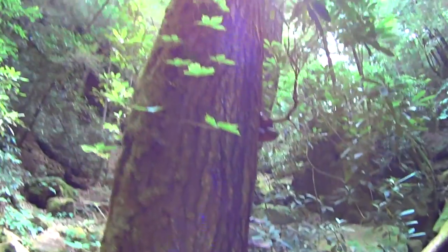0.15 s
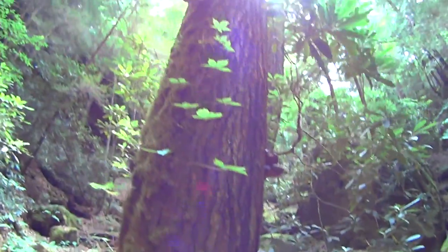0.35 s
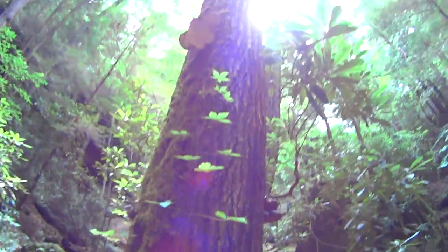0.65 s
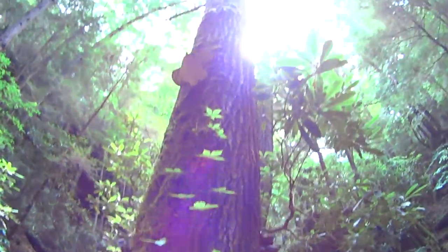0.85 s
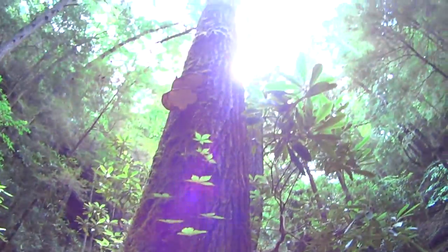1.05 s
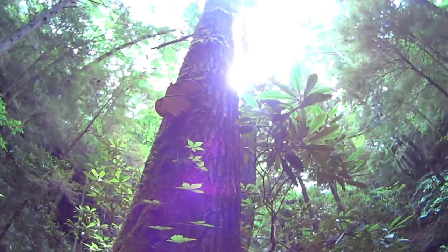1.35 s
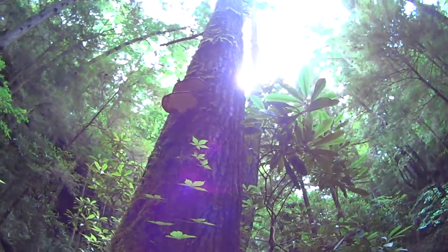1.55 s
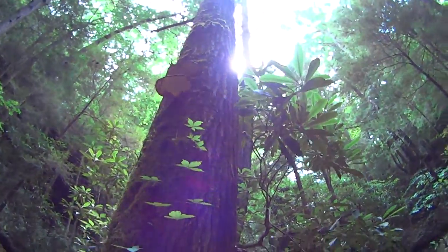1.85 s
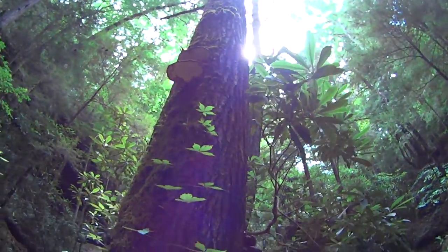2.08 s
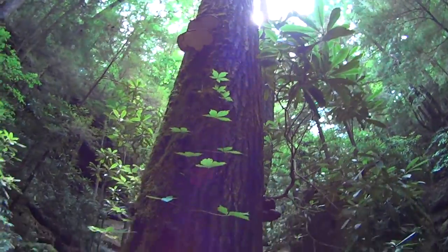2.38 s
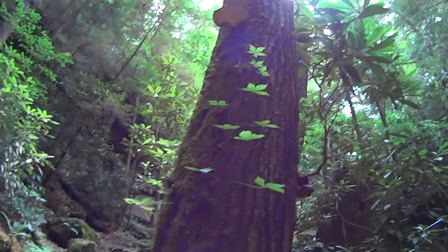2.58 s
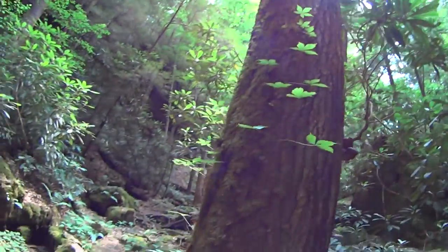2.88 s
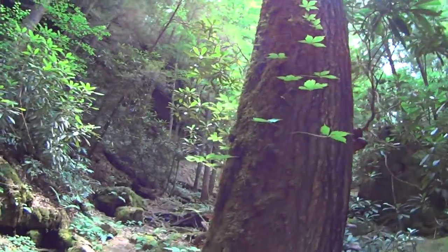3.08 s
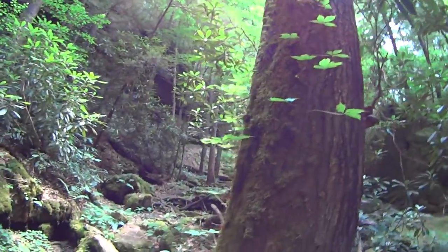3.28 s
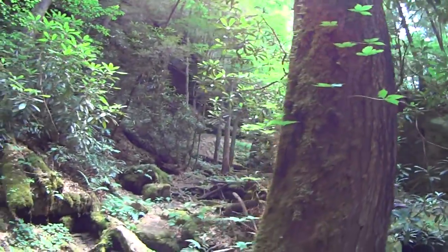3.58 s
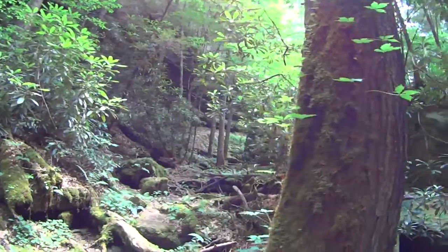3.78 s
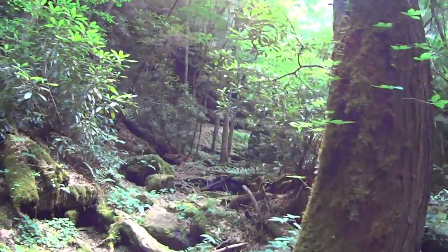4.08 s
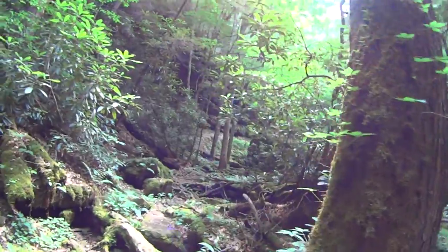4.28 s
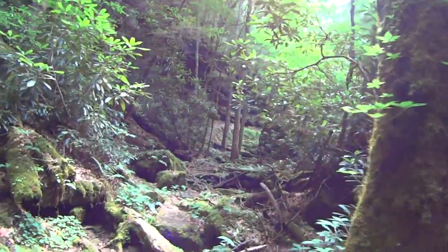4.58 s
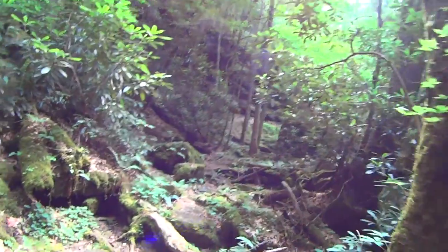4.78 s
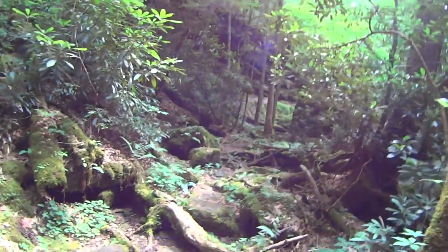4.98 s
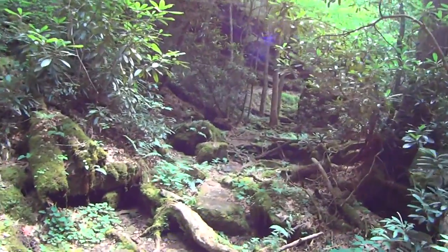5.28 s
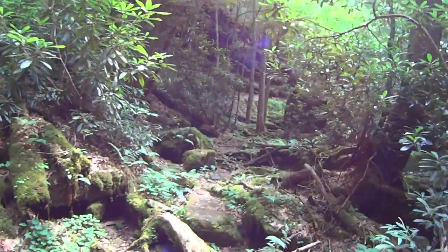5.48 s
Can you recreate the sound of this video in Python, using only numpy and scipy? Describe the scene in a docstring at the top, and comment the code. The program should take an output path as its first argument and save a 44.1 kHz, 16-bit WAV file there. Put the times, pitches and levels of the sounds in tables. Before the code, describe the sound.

Close trickling water with little splashes and hissing spray thins to a faint wash, interrupted by hollow plastic taps and brief handling squeaks.

```python
"""A small brook runs over rocks in a forest, its near water fading as a hand-held camera turns away.
Water: filtered noise for the steady wash, patchy noise and droplets for the fizzing spray,
resonant hollows and rising bubble tones for the trickle, enveloped noise for the splashes.
Hand: knocks, stick-slip rubs and grip noise drive the modes of the plastic camera case."""
import sys
import numpy as np
from scipy import signal
from scipy.fft import rfft, irfft, next_fast_len
from scipy.io import wavfile
from scipy.ndimage import uniform_filter1d

SR = 44100
rng = np.random.default_rng(int(sys.argv[2]) if len(sys.argv) > 2 else 0)


def pcm_store(signal):
    """Save signal as 16-bit PCM."""
    levels = np.round(np.clip(np.atleast_2d(signal), -1, 1) * 32767)
    wavfile.write(sys.argv[1], SR, levels.astype(np.int16).T)


N = 248724
TIME_S = np.arange(N) / SR


def gain_of(db):
    """Decibels to amplitude."""
    return 10 ** (np.asarray(db) / 20)


def evened(x):
    """Scales to rms 1."""
    return x / np.sqrt(np.mean(x ** 2) + 1e-20)


def read(points, hz):
    """Interpolates a table over log frequency."""
    point_hz, value = np.transpose(points)
    return np.interp(np.log(hz + 1), np.log(point_hz + 1), value)


def add(mix, start_s, sound):
    """Mixes a stereo sound in at start_s, cut at the end of the mix."""
    part = mix[:, max(round(start_s * SR), 0):][:, :sound.shape[1]]
    part += sound[:, :part.shape[1]]


def colour(x, gain):
    """Filters by a zero-phase gain given as a function of frequency."""
    size = next_fast_len(x.shape[-1] + 2048)
    spectrum = rfft(x, size) * gain(np.fft.rfftfreq(size, 1 / SR))
    return irfft(spectrum, size)[..., :x.shape[-1]]


def hump(hz, centre_hz, octaves):
    """Gain of a soft band around a centre."""
    return 1 / (1 + (np.log2((hz + 1) / centre_hz) / octaves) ** 2)


def patches(shape, size):
    """Random blotches over frequency and time, rms 1."""
    smooth = uniform_filter1d(rng.standard_normal(shape), size=size, axis=0)
    return evened(uniform_filter1d(smooth, size=size, axis=1))


def churn(patchy_db, flicker_db):
    """Two noises whose level wanders in shared time-frequency patches and flickers as a whole."""
    z = signal.stft(rng.standard_normal((2, N)), nperseg=256)[2]
    patch = patches(z.shape[1:], size=8)
    flicker = evened(uniform_filter1d(rng.standard_normal(z.shape[2]), size=6))
    z = z * gain_of(patchy_db * patch + flicker_db * flicker)
    return evened(signal.istft(z)[1][:, :N])


def mottle(x, depth_db):
    """Countless tiny bubbles: narrow bands rise and dip in level for a moment."""
    z = signal.stft(x, nperseg=1024)[2]
    z = z * gain_of(depth_db * patches(z.shape[1:], size=2))
    return evened(signal.istft(z)[1][:, :N])


def drops(per_s, spread_db):
    """Random impacts, mostly small and a few large."""
    size = gain_of(spread_db * np.minimum(rng.exponential(1, N), 4))
    return size * rng.choice([-1, 1], N) * (rng.random(N) < per_s / SR)


# Water balance of the ports, right mostly louder: hz [Hz], left_minus_right_db [dB]
PORT_BALANCE = [(300, 0.5), (600, -1.5), (1100, -2.5), (1900, -5), (3400, -3), (6000, -3.2), (11000, -2.5)]


def ports(pair, same):
    """Mixes two unrelated signals to the likeness and balance of water at two microphone ports."""
    likeness = lambda hz: np.clip(read(same, hz), 0, 1)
    mid = colour(pair[0], lambda hz: np.sqrt(1 + likeness(hz)))
    side = colour(pair[1], lambda hz: np.sqrt(1 - likeness(hz)))
    left_right = np.array([mid + side, mid - side])
    return colour(left_right, lambda hz: gain_of(np.outer([.5, -.5], read(PORT_BALANCE, hz))))


# Likeness of the ports for near water: hz [Hz], likeness [0-1]
NEAR_LIKENESS = [(300, 0.2), (600, .15), (1160, 1), (2440, 0.55), (5000, 0.9), (11000, 0.89)]


def near_ports(pair):
    """Near water as the two ports hear it."""
    return ports(pair, NEAR_LIKENESS)


# Near water as the camera turns away: time_s [s], level_db [dB]
NEAR_LEVEL = [(0, -43), (1.3, -44.5), (2.1, -44), (3.05, -42.5), (3.35, -45), (4.0, -46.5), (4.25, -45.5),
              (4.5, -51.5), (4.75, -47.5), (4.97, -55), (5.37, -56), (5.64, -49)]


def near_water():
    """Gain of the near water for every sample."""
    return gain_of(np.interp(TIME_S, *np.transpose(NEAR_LEVEL)))


# Resonant hollows between the rocks: centre_hz [Hz], width_hz [Hz], level_db [dB]
ROCK_HOLLOWS = [(1000, 790, -2.5), (1226, 75, 0.5), (1826, 310, -4), (2347, 220, -1), (2685, 130, 0),
                (3085, 570, -4.5), (4220, 840, -2)]


def hollows(hz):
    """Gain of the hollows, their resonances summed in power."""
    power = 0
    for centre_hz, width_hz, level_db in ROCK_HOLLOWS:
        detuning = (hz - centre_hz ** 2 / (hz + 1)) / width_hz
        power = power + gain_of(level_db) ** 2 / (1 + detuning ** 2)
    return np.sqrt(power)


# Spectrum of the far wash: hz [Hz], relative level_db [dB per Hz]
WASH_SPECTRUM = [(25, 4), (60, -4.5), (130, -5), (280, -2), (450, -2), (800, -0.5), (1500, -2),
                 (2500, -3.5), (3300, -7.5), (5500, -8.5), (8000, -11.5), (11000, -18)]
# Likeness of the ports for far water: hz [Hz], likeness [0-1]
FAR_LIKENESS = [(60, 0.7), (260, 0.16), (550, 0.6), (1160, 0), (2440, 0.4), (5000, 0.1), (11000, 0)]
WASH_DB = -50.5


def wash():
    """The even rush of the brook farther off: shaped noise with mild level patches."""
    water = churn(patchy_db=3.0, flicker_db=0.5)
    water = colour(water, lambda hz: gain_of(read(WASH_SPECTRUM, hz)))
    return gain_of(WASH_DB) * evened(ports(water, FAR_LIKENESS))


def wander(rate_hz):
    """A smooth random curve of rms 1."""
    return evened(colour(rng.standard_normal(N), lambda hz: np.exp(-(hz / rate_hz) ** 2)))


# Bursts of spray: peak_s [s], lift_db [dB]
SPRAY_BURSTS = [(.015, 4), (.1, 2), (.2, 8), (.42, 5), (.905, 5), (1.46, 8), (1.916, 9.5), (2.235, 7),
                (2.618, 6.5), (2.98, 2.5), (3.07, 4), (3.41, 6), (4.193, 5)]
SURGE_RISE_S, SURGE_FALL_S = 0.003, 0.026
SPRAY_WANDER_DB, SPRAY_WANDER_HZ = 1, 35  # random swell: rms depth and rate


def surges():
    """Gain of the spray: each burst leaps up and falls back, over a random swell."""
    lift_db = SPRAY_WANDER_DB * wander(SPRAY_WANDER_HZ)
    for peak_s, burst_db in SPRAY_BURSTS:
        rise = (peak_s - TIME_S) / SURGE_RISE_S
        fall = (TIME_S - peak_s) / SURGE_FALL_S
        lift_db += burst_db * np.exp(-np.maximum(rise, fall))
    return gain_of(lift_db)


# Spectrum of the spray: hz [Hz], relative level_db [dB per Hz]
SPRAY_SPECTRUM = [(1000, -17), (2500, -11), (3500, -4), (4300, -2), (5400, 0.5), (7000, 1.5), (9000, 1),
                  (11000, -0.5)]
SPRAY_DB = 2.3  # against the near water, before the surges


def spray():
    """Fine droplets fizz where the water breaks on rocks: mottled noise plus dense impacts."""
    droplets = evened(np.array([drops(per_s=2500, spread_db=8.0) for _ in range(2)]))
    mist = churn(patchy_db=1.94, flicker_db=1.5)
    fizz = mottle(mist, depth_db=2.1) + .3 * droplets
    fizz = near_ports(colour(fizz, lambda hz: gain_of(read(SPRAY_SPECTRUM, hz))))
    return gain_of(SPRAY_DB) * near_water() * surges() * evened(fizz)


TRICKLE_DB = -45.5  # reference for the two parts below
FLOW_DB, BUBBLES_DB = -3, -14
TRICKLE_FOLLOWS = 0.87  # share of the near water's dB changes


def trickle():
    """Water tumbles through the hollows, trapping small bubbles that ring and rise in pitch."""
    tumble = mottle(churn(patchy_db=3.5, flicker_db=1.3), depth_db=4.0)
    flow = evened(near_ports(colour(tumble, hollows)))
    t = np.arange(2048) / SR
    bubbles = np.zeros((2, N))
    for bubble_hz in np.geomspace(950, 4600, num=24):
        tone = np.sin(2 * np.pi * bubble_hz * t * (1 + 1.35 * t))
        ring = tone * np.exp(-t * bubble_hz / 20) * (1 - np.exp(-t * bubble_hz / 2))
        pan_db = rng.normal(-3.5, 3)  # left minus right
        births = drops(per_s=6, spread_db=2.5)
        bubbles += gain_of([[pan_db / 2], [-pan_db / 2]]) * signal.oaconvolve(births, ring)[:N]
    level = gain_of(TRICKLE_DB) * evened(near_water() ** TRICKLE_FOLLOWS)
    return level * (gain_of(FLOW_DB) * flow + gain_of(BUBBLES_DB) * evened(bubbles))


# Modes of the plastic case: mode_hz [Hz], level_db [dB], t60_s [s], port_phase_rad [rad]
CASE_MODES = [(202, -2, 0.041, 1.84), (323.2, -2, 0.085, 0.93), (431, 0.5, 0.058, 1.3),
              (485, 5.5, 0.037, 2.33), (579, 5.5, 0.019, 1.81), (866, 6.5, 0.015, 1.96),
              (950, 0, 0.022, 2.94), (1286, 16.5, 0.0029, 1.81), (1596, -2.5, 0.016, 0.45),
              (2050, 9.5, 0.0013, 3.14), (2610, 5, 0.0087, 1.7), (5230, 1, 0.017, 1.1)]


def case(force):
    """The plastic case rings under a force; its modes reach the two ports out of step."""
    t = np.arange(SR // 8) / SR
    sides = np.array([[-.5], [.5]])
    ring = np.zeros((2, len(t)))
    for k, (mode_hz, level_db, t60_s, port_phase_rad) in enumerate(CASE_MODES):
        phase = (-1) ** k * sides * port_phase_rad  # the leading port alternates
        ring += gain_of(level_db - 60 * t / t60_s) * np.sin(2 * np.pi * mode_hz * t + phase)
    return signal.fftconvolve(force[None], ring, axes=1)


# Spectrum of the grip rumble: hz [Hz], relative level_db [dB per Hz]
RUMBLE_SPECTRUM = [(20, -12.5), (60, -17.5), (120, -25.5), (250, -61), (600, -41)]
# The hand shifts its hold: middle_s [s], length_s [s], level_db of murmur and rumble alike [dB]
HOLD_SHIFTS = [(0.19, 0.43, -65), (0.797, 0.64, -53.5), (1.656, 0.79, -59), (2.157, 0.67, -57),
               (4.666, 0.19, -63)]
MURMUR_DB, RUMBLE_DB = -59.5, -68.5  # grip at rest


def grip():
    """The hand keeps the case murmuring and rumbles through it, more so while it shifts."""
    creep = churn(patchy_db=2, flicker_db=2)[0]
    murmur = case(colour(creep, lambda hz: hump(hz, 390, octaves=2.8)))[:, :N]
    rumble = colour(rng.standard_normal(N), lambda hz: gain_of(read(RUMBLE_SPECTRUM, hz)))
    shift = np.zeros(N)
    for middle_s, length_s, level_db in HOLD_SHIFTS:
        position = np.clip((TIME_S - middle_s) / length_s, -.5, .5)
        shift += gain_of(level_db) * np.cos(np.pi * position) ** 2
    murmur = (gain_of(MURMUR_DB) + shift) * evened(murmur)
    return murmur + (gain_of(RUMBLE_DB) + shift) * evened(rumble)


def splash(centre_hz, rise_s, t60_s, slap=0.18, slap_s=0.00025):
    """A slap and a short spatter in the hollows, coloured by the size of its drop."""
    t = np.arange(SR // 8) / SR
    noise = rng.standard_normal((2, len(t)))
    spatter = colour(noise, lambda hz: hollows(hz) * hump(hz, centre_hz, octaves=0.48))
    onset = (1 - np.exp(-t / rise_s)) * (1 + slap * np.exp(-t / slap_s))
    return evened(near_ports(spatter)) * onset * gain_of(-60 * t / t60_s)


SMALL_PER_S = 9.9
SMALL_MIN_DB, SMALL_SPAN_DB = -2, 12  # against the near water, before the splash envelope
SMALL_LOW_HZ, SMALL_HIGH_HZ = 1960, 6500
SMALL_RISE_S, SMALL_T60_S = .0015, 0.047


def small_splashes():
    """Lesser splashes fall at random in the near water."""
    out = np.zeros((2, N))
    for when, size, pitch in rng.random((round(SMALL_PER_S * N / SR), 3)):
        centre_hz = SMALL_LOW_HZ * (SMALL_HIGH_HZ / SMALL_LOW_HZ) ** pitch
        level = gain_of(SMALL_MIN_DB + SMALL_SPAN_DB * size)
        add(out, when * N / SR, level * splash(centre_hz, SMALL_RISE_S, SMALL_T60_S))
    return near_water() * out


# Loudest splashes: start_s [s], level_db before the envelope [dB], centre_hz [Hz], rise_s [s], t60_s [s]
LOUD_SPLASHES = [(0.042, -36.5, 2330, .002, 0.074), (0.0927, -31, 5000, 0.00035, 0.046),
                 (0.412, -33, 2720, .004, 0.082), (.481, -33.5, 3080, .002, 0.099),
                 (.5768, -28, 2010, 0.00022, 0.084), (0.673, -35.5, 2490, .004, .066),
                 (1.158, -43, 1080, 0.0032, 0.29), (1.186, -39.5, 2780, 0.0042, 0.14),
                 (1.238, -26.5, 2790, 0.0031, 0.038), (1.305, -35, 1150, .0036, 0.081),
                 (1.91, -33, 2880, 0.0013, 0.12), (1.985, -33.5, 1250, 0.0019, .04),
                 (2.298, -35.5, 3140, 0.0012, 0.16), (2.407, -28.5, 2750, .0003, 0.1),
                 (2.541, -32.5, 2680, 0.00022, 0.089), (2.646, -34.5, 2800, .0018, 0.12),
                 (3.053, -38.5, 2650, 0.0057, 0.18), (3.107, -32, 1800, 0.0016, 0.049),
                 (3.287, -29, 4500, 0.0022, 0.021), (3.346, -33, 1820, 0.0038, 0.024),
                 (3.608, -38.5, 2450, .0027, 0.15), (3.781, -39.5, 2490, 0.0028, .09),
                 (4.279, -38, 2290, 0.0015, 0.23)]


def splashes():
    """The splashes that stand out of the brook: enveloped noise bursts at set times."""
    out = np.zeros((2, N))
    for start_s, level_db, centre_hz, rise_s, t60_s in LOUD_SPLASHES:
        add(out, start_s, gain_of(level_db) * splash(centre_hz, rise_s, t60_s))
    return out


# Finger slips on the case: start_s [s], length_s [s], squeak_db [dB], slip_hz [Hz], scratch_db [dB]
FINGER_RUBS = [(.139, 0.015, -33, 280, -65), (.156, 0.031, -29.5, 189.6, -64), (.17, 0.02, -28, 473, -60),
               (.189, 0.013, -32, 460, -58), (0.499, 0.032, -41, 430, -44.5),
               (1.455, 0.015, -24.5, 416, -38), (1.533, 0.024, -33, 417, -75),
               (1.549, 0.081, -37.5, 437.6, -43.5), (1.92, 0.017, -28, 418, -52),
               (2.093, 0.18, -51, 331, -67), (2.89, 0.024, -37.5, 505, -43), (4.06, 0.43, -54.5, 318, -65),
               (4.529, 0.02, -44.5, 275, -43.5), (4.741, 0.0036, -63, 494, -38),
               (4.782, 0.0019, -68, 500, -45), (5.423, 0.0069, -61, 1210, -38),
               (5.428, 0.041, -52, 1420, -40), (5.447, 0.0075, -37, 5220, -55)]


def rubs(jitter=0.144, rough=0.42, grain_db=3.0):
    """Skin sticks and slips: uneven slips drive the case into a squeak, with a dry scratch on top."""
    out = np.zeros((2, N))
    for start_s, length_s, squeak_db, slip_hz, scratch_db in FINGER_RUBS:
        stroke = signal.windows.tukey(int(length_s * SR), .5)
        drift, drag, skin, ridges = rng.standard_normal((4, SR))[:, :len(stroke)]
        rate_hz = slip_hz * (1 + jitter * evened(uniform_filter1d(drift, size=150)))
        turns = np.cumsum(rate_hz) / SR
        # one impulse per whole turn
        slips = evened(np.diff(np.floor(turns), prepend=0)) + rough * drag
        force = colour(slips, lambda hz: hump(hz, max(slip_hz, 460), octaves=1.0)) * stroke
        squeak = case(force)
        squeak *= np.sqrt(len(stroke) / np.sum(squeak ** 2 / 2))  # rms 1 over the stroke length
        add(out, start_s, gain_of(squeak_db) * squeak)
        catches = gain_of(grain_db * evened(uniform_filter1d(ridges, size=60)))
        scratch = colour(skin * catches, lambda hz: hump(hz, 4200, octaves=2.0))
        scratch = evened(scratch) * stroke
        add(out, start_s, gain_of(scratch_db) * scratch * gain_of([[-1], [1]]))
    return out


# Finger knocks: start_s [s], ring_db over the first 20 ms [dB], hard_hz contact hardness [Hz],
# second_s delay of the second contact [s], thud_db peak [dB]
FINGER_KNOCKS = [(.504, -38.5, 1200, 0.0078, -62), (.552, -46.5, 800, 0.0031, -35),
                 (1.2569, -23, 860, 0.0038, -13.5), (1.4596, -34.5, 830, 0.0075, -49),
                 (1.4948, -28, 1030, 0.0037, -24), (1.7977, -44, 380, 0.0077, -33),
                 (1.9212, -34, 1130, 0.00454, -24), (2.0490, -31, 610, 0.0039, -34),
                 (2.0751, -38.5, 1400, 0.00145, -65), (2.629, -30, 334, 0.0037, -42),
                 (2.754, -44, 2420, .0012, -65), (2.8814, -23, 2860, 0.0015, -38),
                 (2.8847, -26.5, 395, 0.004, -21.5), (2.9973, -44, 2810, 0.0013, -63),
                 (5.4769, -43, 260, 0.0028, -29.5)]


def knocks(thud_s=0.00083, second=0.68, rattle_s=0.013, skew_s=0.00094):
    """A finger lands twice, pushing the camera and ringing the case; harder is shorter and thinner."""
    out = np.zeros((2, N))
    t = np.arange(SR // 20) / SR
    rebound = np.array([[0.756], [0.448]])  # left, right
    for start_s, ring_db, hard_hz, second_s, thud_db in FINGER_KNOCKS:
        def contact(delay_s):
            """Force pulse of one contact."""
            since_s = np.maximum(t - delay_s, 0)
            return since_s * np.exp(-2 * np.pi * hard_hz * since_s)

        chatter = rng.standard_normal(len(t)) * np.exp(-t / rattle_s)
        loose = signal.fftconvolve(contact(0), chatter / np.linalg.norm(chatter))[:len(t)]
        force = contact(0) + second * contact(second_s) + .3 * loose
        ring = case(signal.lfilter(*signal.butter(1, hard_hz / 4, "high", fs=SR), force))
        add(out, start_s, gain_of(ring_db) * ring / ring[:, :SR // 50].std())
        # the push reaches the right port first
        u = np.maximum(t - np.array([[skew_s], [0]]), 0) / thud_s
        thud = u * (1 - rebound * u) * np.exp(-u)
        add(out, start_s, gain_of(thud_db) * thud / abs(thud).max())
    return out


def scene():
    """The brook and the hand on the camera."""
    water = wash() + spray() + trickle() + small_splashes() + splashes()
    hand = grip() + rubs() + knocks()
    return water + hand


EDGE_HZ = 11070


def record(dry):
    """The microphone drops the deepest bass; then a low-pass limits the band."""
    thinned = signal.lfilter(*signal.butter(1, 22, "high", fs=SR), dry)
    low_pass = signal.firwin(701, EDGE_HZ, window=("kaiser", 9), fs=SR)
    return signal.oaconvolve(thinned, low_pass[None], "same")


dry = scene()
out = record(dry)
pcm_store(out)
```